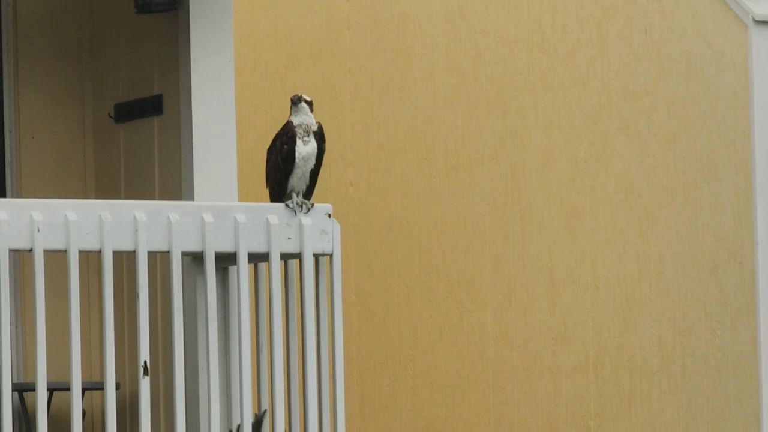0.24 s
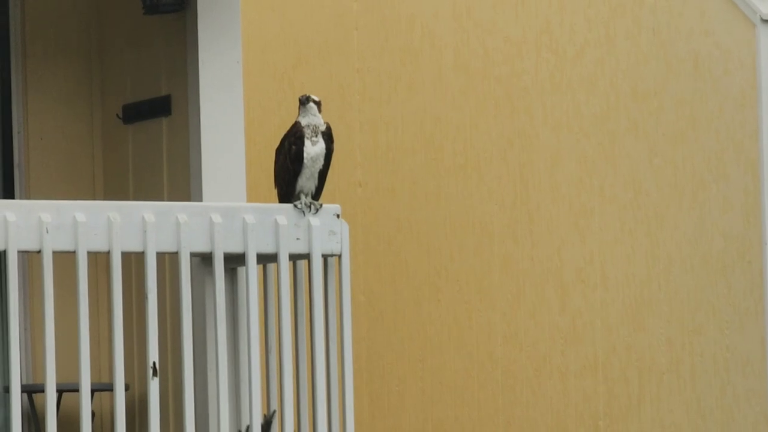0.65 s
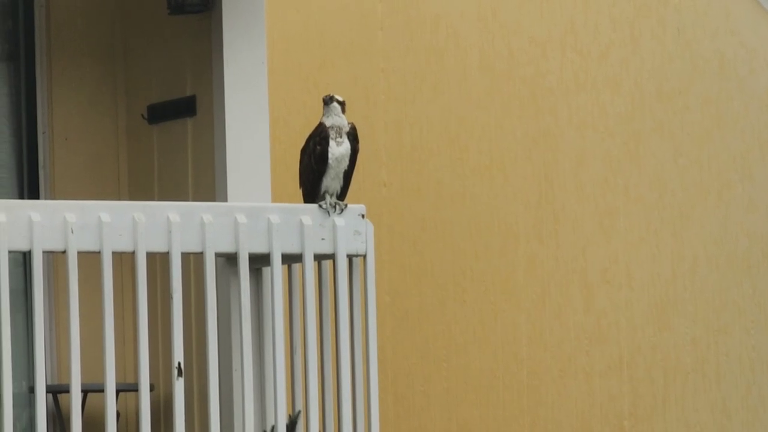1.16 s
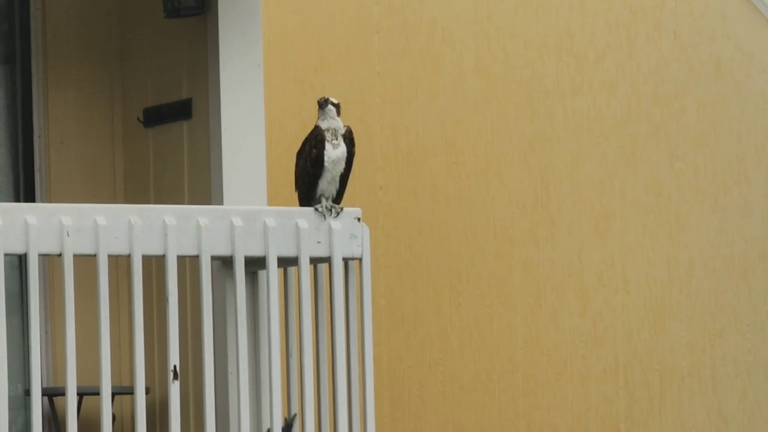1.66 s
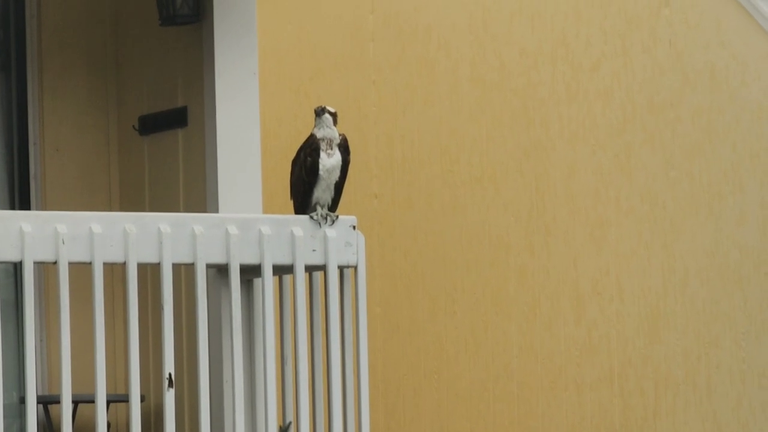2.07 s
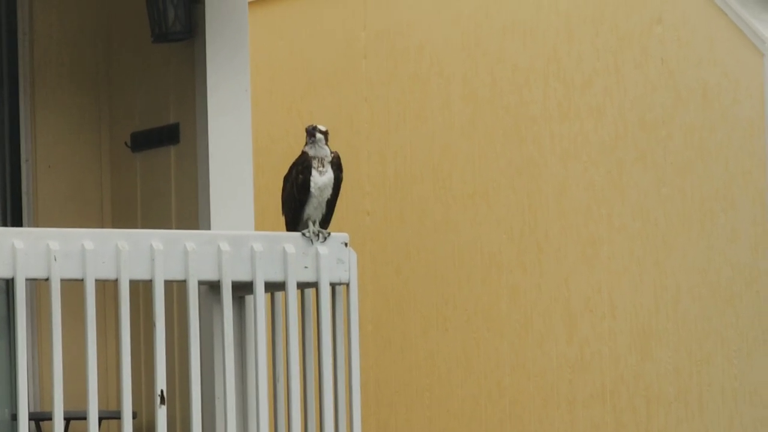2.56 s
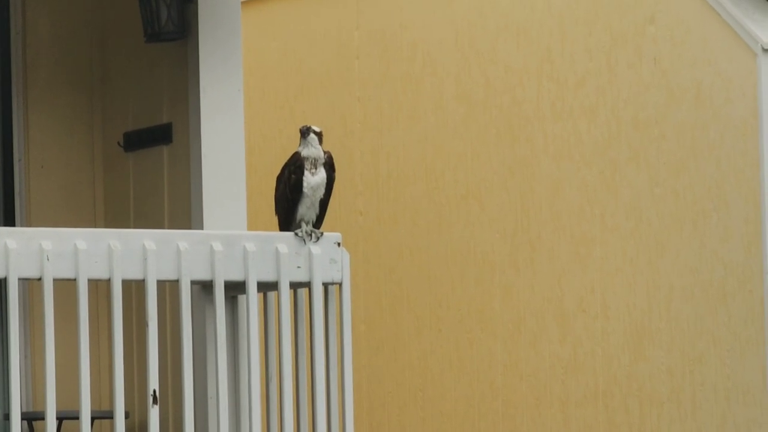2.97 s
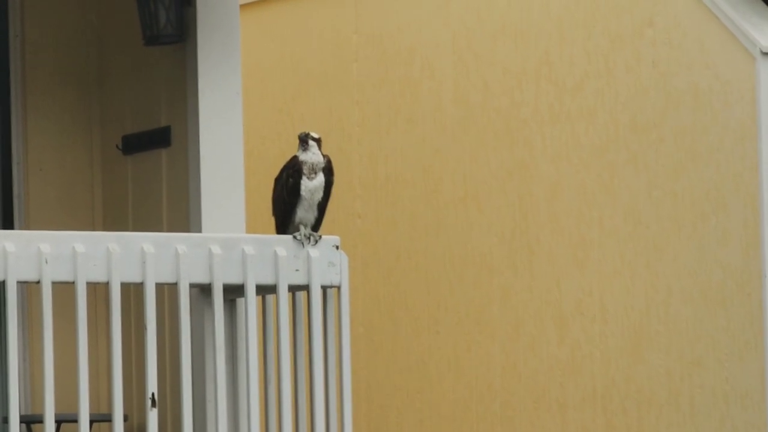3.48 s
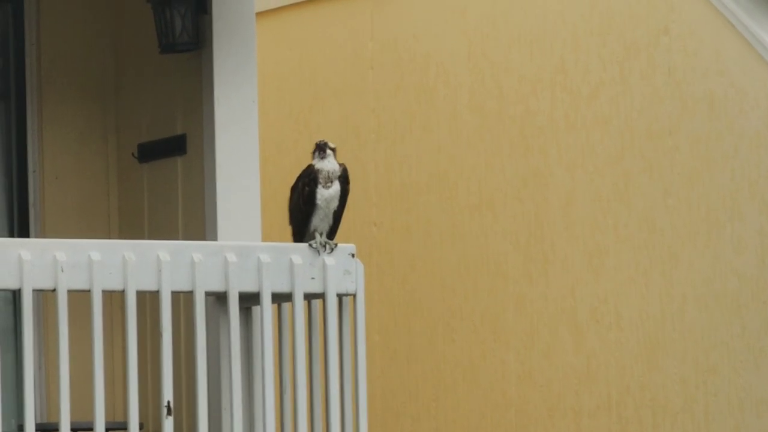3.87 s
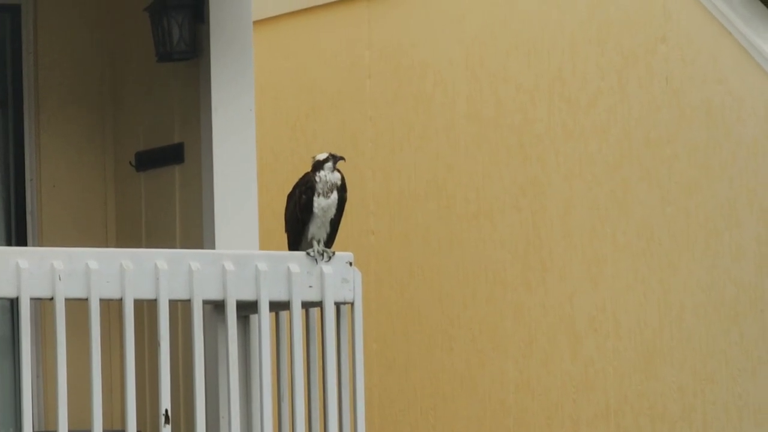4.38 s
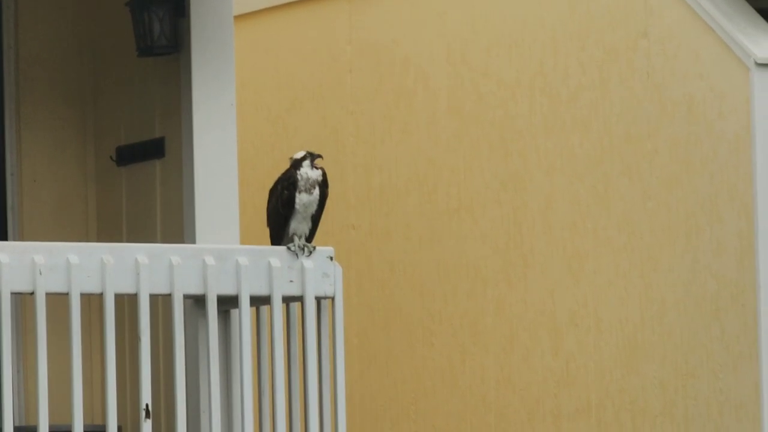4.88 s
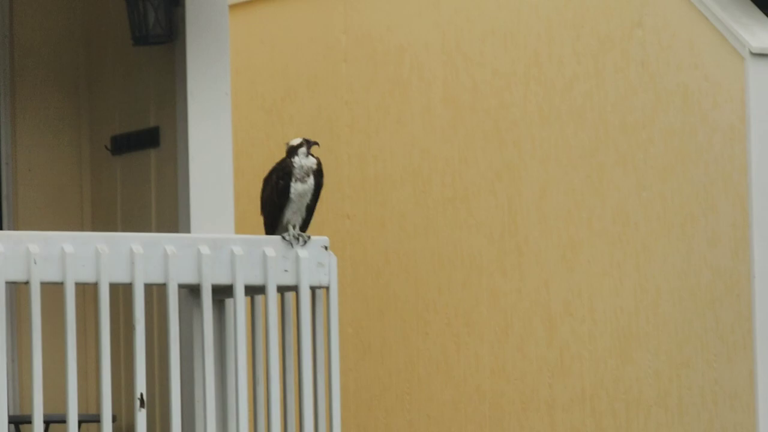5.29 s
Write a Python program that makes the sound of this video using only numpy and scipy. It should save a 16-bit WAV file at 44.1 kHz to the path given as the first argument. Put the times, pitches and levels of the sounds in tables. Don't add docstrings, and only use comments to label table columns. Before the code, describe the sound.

Steady faint low traffic rumble with soft hiss, heard in stereo from a hand-held camera at some distance. A large bird of prey whistles three clean descending notes, well spaced, then turns raspy: two sharp squealing cries, a quick uneven burst of chirping shrieks, a short gap, and a weaker final cry. Close walls give a hard slap and lingering reverberation. Tiny bright clicks and a dull grip knock appear.

```python
import sys
import numpy as np
from scipy import signal
from scipy.fft import rfft, irfft, next_fast_len
from scipy.io import wavfile
from scipy.ndimage import uniform_filter1d

SR = 44100
rng = np.random.default_rng(int(sys.argv[2]) if len(sys.argv) > 2 else 0)


def store_pcm(level_fs):
    pcm = np.round(np.clip(level_fs, -1, 1) * 32767).astype(np.int16)
    wavfile.write(sys.argv[1], SR, np.atleast_2d(pcm).T)


def nominal_scale(level):
    x = np.asarray(level, float) / 20
    return 10 ** x


N = 244314


def evened(x):
    return x / np.sqrt(np.mean(abs(x) ** 2) + 1e-20)


def read(points, hz):
    f, value = np.transpose(points)
    return np.interp(np.log(hz + 1), np.log(f + 1), value)


def add(mix, s, sound):
    part = mix[..., round(s * SR):][..., :sound.shape[-1]]
    part += sound[..., :part.shape[-1]]


def band(x, low_hz, high_hz):
    sos = signal.butter(N=2, Wn=(low_hz, high_hz), btype="band", fs=SR, output="sos")
    return signal.sosfilt(sos, x)


def wander(hz):
    smooth = signal.butter(N=2, Wn=min(hz, SR / 3), fs=SR)
    return evened(signal.lfilter(*smooth, rng.standard_normal(N + SR)))


def air():
    # hz, level_db per Hz
    background = [(20, -28), (45, -29), (80, 2), (130, -1.5), (210, -4), (300, -5.5), (446, -11.5),
                  (650, -11.5), (1060, -16.5), (1400, -16.5), (2140, -21.5), (3000, -26), (5000, -36),
                  (16000, -45)]
    # hz, level_db
    hiss = [(4500, 0.5), (5300, -3.5), (5800, -10.5), (6700, -15.5), (8300, -4.5), (10000, -9.5),
            (11200, 1), (12500, 3.5), (14500, 3.5), (15700, 2)]
    # hz, share 0-1
    likeness = [(60, .99), (130, .975), (260, .85), (500, .33), (1000, .5), (2000, .4), (4000, .15),
                (8000, 0)]
    # hz, level_db
    lean = [(60, 1.5), (150, -0.5), (380, 1.5), (950, -1.0), (2380, -3.5), (5980, 14), (15000, 6.5)]
    # hz, lag_radians
    lead = [(60, 0), (150, .1), (340, .45), (700, 1.9), (1100, 3.5), (1550, 5), (2070, 7.3), (3700, 12.6)]
    frames, hz = N // 256 + 5, np.fft.rfftfreq(1024, 1 / SR)
    a, b, c, d, patches = rng.standard_normal((frames, 513, 5)).T
    patches = uniform_filter1d(patches, size=14, axis=0)
    patches = evened(uniform_filter1d(patches, size=20, axis=1))
    same = np.clip(read(likeness, hz), -1, 1)[:, None]
    left = a + 1j * b
    shared = same * left * np.exp(-1j * read(lead, hz))[:, None]
    right = shared + np.sqrt(1 - same ** 2) * (c + 1j * d)
    level_db = (read(background, hz) + read(hiss, hz))[:, None] + 0.28 * patches
    side_db = np.multiply.outer([.5, -.5], read(lean, hz))[..., None]
    z = np.array([left, right]) * nominal_scale(level_db + side_db)
    out = signal.istft(z, nperseg=1024, noverlap=768)[1][:, :N]
    return nominal_scale(-42.5) * out / np.sqrt(np.mean(out.mean(0) ** 2))


def taps_on_camera(events, spread, t60_s, tail_db):
    out, t = np.zeros((2, N)), np.arange(2000) / SR
    chance = rng.standard_normal((len(events), 2, len(t)))
    for (s, db, hz, pan_db), noise in zip(events, chance):
        rattle = nominal_scale(tail_db - 60 * t / 0.055)
        onset = np.minimum(t / 0.0016, 1)
        burst = noise * (nominal_scale(-60 * t / t60_s) + rattle) * onset
        burst = band(burst, hz / (1 + spread), min(hz * (1 + spread), .36 * SR))
        side_db = np.array([[.5], [-.5]]) * pan_db
        add(out, s, nominal_scale(db + side_db) * burst / abs(burst).max())
    return out


def camera_handling():
    # start_s, peak_db, centre_hz, left_minus_right_db
    body_ticks = [(0.1072, -38, 15600, 5.5), (0.1104, -51, 11800, 3.5), (0.598, -53, 12500, 11),
                  (0.7472, -45, 11500, 13), (1.0134, -54, 6780, 12), (1.291, -47, 11200, 16),
                  (1.297, -52, 8700, 13), (2.1655, -51, 14400, 7.5), (2.4154, -54, 6020, 8),
                  (3.039, -54, 6250, 11), (3.2395, -49, 6100, 6.5), (3.5905, -54, 6670, 11.0),
                  (3.7404, -52, 6680, 16), (5.1194, -52, 12050, 3.0)]
    # start_s, peak_db, centre_hz, left_minus_right_db
    grip_knocks = [(2.1577, -37, 1430, -8), (2.166, -27.5, 1360, -1), (2.4134, -47, 1540, -7),
                   (2.4154, -36.5, 1335, -8)]
    bright = taps_on_camera(body_ticks, spread=.35, t60_s=.014, tail_db=-12)
    dull = taps_on_camera(grip_knocks, spread=.3, t60_s=.014, tail_db=-16)
    return bright + dull


def note(rows, jitter, flutter, breath):
    overtones_db = [-13, -37, -43.5, -57]
    s, *columns = np.transpose(rows)
    t = np.arange(s[0], s[-1], 1 / SR)
    hz, effort_db, rough, gap_hz, second_db = (np.interp(t, s, c) for c in columns)
    effort_db = effort_db - np.maximum(hz - 4900, 0) / 300
    here = slice(round(s[0] * SR), round(s[0] * SR) + len(t))
    rough = np.clip(rough, 0, 1)
    first = np.exp(2j * np.pi * np.cumsum(hz) / SR + 2.1j * rough * jitter[here])
    beat = np.exp(2j * np.pi * np.cumsum(gap_hz) / SR + 2j * rough * flutter[here])
    far_mirror = np.where((gap_hz < 0) & (gap_hz > -1000), .5, .1)
    lines = nominal_scale(second_db) * (beat + .4 / beat + .25 * beat ** 2 + far_mirror / beat ** 2)
    swell = (1 + 0.86 * rough * flutter[here]) / np.sqrt(1 + nominal_scale(2 * second_db))
    tone = first * (1 + lines)
    settled = nominal_scale(-np.minimum(abs(np.gradient(hz) * SR) / 5000, 9))
    mixed = settled * (1 + .7 * lines)
    strain_db = .26 * (effort_db + 15.5)
    for k, db in enumerate(overtones_db, 2):
        tone += nominal_scale(db + strain_db) * first ** k * mixed * (k * hz < .4 * SR)
    hiss = rough * breath[here] * abs(1 + lines)
    fades = signal.windows.tukey(len(t), .08)
    return s[0], np.sqrt(2) * nominal_scale(effort_db) * swell * (tone.real + hiss) * fades


def whistles():
    # time_s, pitch_hz, effort_db
    curves = [
        [(.832, 2153, -38), (.865, 2126, -25), (.885, 1998, -30), (.907, 1850, -46)],
        [(1.77, 2596, -43), (1.79, 2488, -25), (1.825, 2388, -23), (1.855, 2047, -27), (1.872, 1930, -52)],
        [(2.555, 6100, -37), (2.57, 4800, -34.5), (2.585, 3700, -22), (2.6, 3200, -17), (2.65, 2765, -14.5),
         (2.685, 2484, -24.5), (2.708, 2240, -33.5)],
    ]
    clear_rough, no_gap_hz, silent_db = .012, 0, -60
    return [[(*point, clear_rough, no_gap_hz, silent_db) for point in curve] for curve in curves]


def cry(start, top_hz, broken, settled, upper, lower, curve, waver):
    break_s, settle_s, sweep_rough = .01, .03, .18
    s, hz, effort_db = np.transpose(curve)
    t = np.arange(start, s[-1], .001)
    left = np.clip((s[0] - t) / (s[0] - start), 0, 1)
    after = np.maximum(t - s[0], 0)
    joined = np.minimum(after / break_s, 1)
    broken_rough = settled + (broken - settled) * np.exp(-after / settle_s)
    rough = (1 - joined) * sweep_rough + joined * broken_rough
    drift_hz = 400 * rough * joined * waver[:, (t * SR).astype(int)]
    sweep = (top_hz / hz[0]) ** left ** 1.1
    main_hz = np.interp(t, s, hz) * sweep + .4 * drift_hz[0]
    main_db = np.interp(t, s, effort_db) - 11 * left
    upper_hz, climb, upper_db, fade = upper
    flip_s, lower_hz, slide, lower_db = lower
    above_hz, below_hz = upper_hz + climb * after, lower_hz + slide * (t - flip_s)
    second_hz = np.where(t < flip_s, above_hz, below_hz) + drift_hz[1]
    second_db = np.where(t < flip_s, upper_db + fade * after, lower_db)
    second_db = second_db - 60 * (1 - joined) ** 2
    return np.transpose([t, main_hz, main_db, rough, second_hz - main_hz, second_db])


def cries():
    # start_s, sweep_top_hz, break_roughness (0-1), settled_roughness (0-1)
    openings = [
        (3.374, 7000, .5, .11),
        (3.927, 7400, .45, .13),
        (4.33, 7500, .12, .32),
        (4.4, 5200, .45, .42),
        (4.54, 5600, .5, .32),
        (4.688, 4500, .45, .28),
        (4.76, 3480, .08, .11),
        (5.325, 7200, .45, .34),
    ]
    # pitch_hz, slide_hz_per_s, level_db, fade_db_per_s
    uppers = [(4800, -4000, -4, -120), (4750, 4998, -2.5, 0), (3400, 0, -31, 200), (4300, 0, -21, 100),
              (4650, 2, -4, 97), (4680, 0, -8, 0), (4200, 0, -14, 0), (5460, 2502, -10, -30)]
    # flip_s, pitch_hz, slide_hz_per_s, level_db
    lowers = [(3.498, 2717, -500, -9.5), (4.011, 3086, -10000, -11.5), (4.391, 3350, 5, -3),
              (4.445, 3236, 500, -5.5), (4.582, 3243, 505, -2.5), (4.726, 3720, -5000, -4),
              (4.775, 2777, -8000, -11.5), (5.395, 3490, -500, -3.5)]
    # time_s, pitch_hz, effort_db
    lone = [
        [(3.384, 4470, -26.5), (3.39, 3620, -35), (3.396, 4363, -32), (3.412, 4300, -33), (3.418, 3700, -29),
         (3.447, 3640, -30.5), (3.465, 3150, -35), (3.485, 3345, -27.5), (3.532, 3306, -45.5)],
        [(3.934, 4800, -25), (3.941, 3400, -44), (3.947, 4530, -27.5), (3.964, 4033, -31.5),
         (4.008, 4052, -32.5), (4.03, 3585, -29.5), (4.045, 3450, -29), (4.08, 3470, -50)],
        [(5.334, 4700, -30), (5.342, 3596, -36.5), (5.356, 3760, -33.5), (5.362, 4596, -40), (5.42, 4300, -36),
         (5.46, 4390, -39.5), (5.5, 4890, -37.5), (5.55, 4750, -36)],
    ]
    # time_s, pitch_hz, effort_db
    chatter = [
        [(4.342, 4000, -32.5), (4.352, 3400, -25), (4.362, 2850, -32.5), (4.39, 3100, -44)],
        [(4.418, 4200, -30), (4.434, 3350, -31.5), (4.465, 4200, -39), (4.5, 4100, -39.5), (4.53, 3750, -37)],
        [(4.547, 3950, -31.5), (4.558, 3650, -32.5), (4.58, 3900, -41), (4.61, 4420, -38), (4.657, 4400, -42.5),
         (4.682, 4200, -34)],
        [(4.7, 3950, -33), (4.715, 3700, -35), (4.733, 4350, -40), (4.77, 4400, -32)],
        [(4.785, 3100, -30), (4.812, 2970, -30), (4.848, 2930, -45)],
    ]
    breaths_db = [-17.5, -12.5, -29, -30, -28, -31, -16, -26]
    waver = np.array([wander(hz=25), wander(hz=40)])
    curves = lone[:2] + chatter + lone[2:]
    rows = [cry(*opening, upper, lower, curve, waver)
            for opening, upper, lower, curve in zip(openings, uppers, lowers, curves)]
    return zip(rows, breaths_db)


def osprey():
    jitter, flutter = wander(hz=370), wander(hz=280)
    breath = evened(band(wander(hz=12000), 7500, 15000))
    bird = np.zeros(N)
    for rows in whistles():
        add(bird, *note(rows, jitter, flutter, nominal_scale(-10.5) * breath))
    for rows, breath_db in cries():
        add(bird, *note(rows, jitter, flutter, nominal_scale(breath_db) * breath))
    return bird


def scatter(start, t60):
    taps = np.zeros((2, SR))
    at = np.arange(start, SR - 20, 20) + rng.integers(0, 20, (2, (SR - start - 1) // 20))
    np.put_along_axis(taps, at, rng.choice([-1., 1.], at.shape), 1)
    hz, t, z = signal.stft(taps, SR, nperseg=256)
    tail = signal.istft(z * nominal_scale(-60 * t / t60(hz)[:, None]), SR, nperseg=256)[1][:, :SR]
    return tail / np.linalg.norm(tail[0])


def yard(x):
    # left_ms, right_ms
    direct_ms = (0, .1)
    # left_ms, right_ms
    wall_ms = (8.05, 8.26)
    # hz, level_db
    wall_colour = [(2000, -4.5), (3500, -5.5), (5000, -4.5), (7000, -3.5), (12000, -13)]
    # hz, t60_s
    yard_t60 = [(1500, 0.89), (3000, 0.97), (6000, 0.88), (9000, 0.99), (14000, 0.43)]
    # delay_s, level_db
    houses = [(.03, 2), (0.071, -2), (.1, -3.5), (.17, 2), (.21, -1), (.27, 0.5), (.31, 0.5), (.36, 0.5),
              (.45, 1), (.6, 4.5)]
    # hz, level_db
    left_port = [(1500, -14.5), (2300, 0.5), (3000, -0.5), (4500, 0), (5800, -1), (7000, 1.5), (8500, 1),
                 (10000, -2.5), (12500, 10.5), (16000, 2.5)]
    # hz, level_db
    right_port = [(1500, -6.5), (2300, 5), (3000, -4), (4500, -2.5), (5800, -19), (7000, -20),
                  (8500, -13.5), (10000, -0.5), (12500, 12), (16000, -21)]
    size = next_fast_len(N + SR)
    hz = np.fft.rfftfreq(size, 1 / SR)
    direct, wall = (np.exp(-2j * np.pi * np.outer(ms, hz) / 1000) for ms in (direct_ms, wall_ms))
    porch = nominal_scale(-1.5) * scatter(start=420, t60=lambda f: .13 + 0 * f)
    late = nominal_scale(-6) * scatter(start=1000, t60=lambda f: read(yard_t60, f))
    late *= nominal_scale(np.interp(np.arange(SR) / SR, *np.transpose(houses)))
    path = direct + nominal_scale(read(wall_colour, hz)) * wall + rfft(porch + late, size)
    ports = nominal_scale(np.array([read(left_port, hz), read(right_port, hz)]))
    return irfft(rfft(x, size) * path * ports, size)[:, :N]


def starve(x, below_db, slope_db, floor_db):
    hz, t, z = signal.stft(x, SR, nperseg=2048, noverlap=1024, window="cosine")
    power = (abs(z[:, :1024]) ** 2).mean(0)
    level_db = 10 * np.log10(power.reshape(128, 8, -1).mean(1) + 1e-20)
    above = np.subtract.outer(np.arange(128), np.arange(128))
    apart = np.where(above > 0, above, -4 * above)
    hidden_db = (level_db[None] - slope_db * apart[..., None]).max(1) - below_db
    kept = np.where(level_db > np.maximum(hidden_db, floor_db), 1, .05)
    z[:, :1024] *= np.repeat(kept, 8, axis=0)
    z = z * (hz < 15800)[:, None]
    return signal.istft(z, SR, nperseg=2048, noverlap=1024, window="cosine")[1][:, :N]


def scene():
    return air() + camera_handling() + yard(osprey())


def top_cut(x):
    return signal.sosfilt(signal.butter(12, 16490, fs=SR, output="sos"), x)


def record(dry):
    thinned = starve(dry, below_db=53, slope_db=.2, floor_db=-105.8)
    return top_cut(thinned)


dry = scene()
out = record(dry)
store_pcm(out)
```